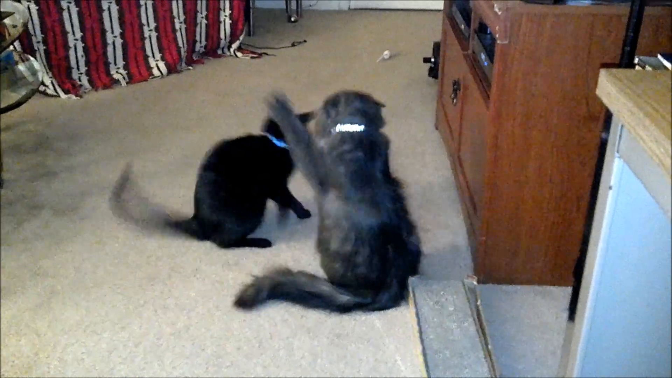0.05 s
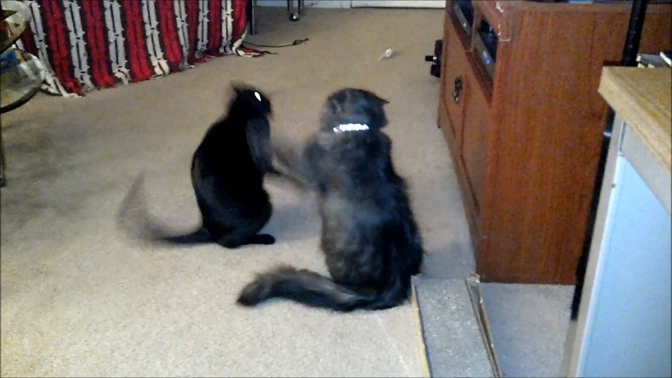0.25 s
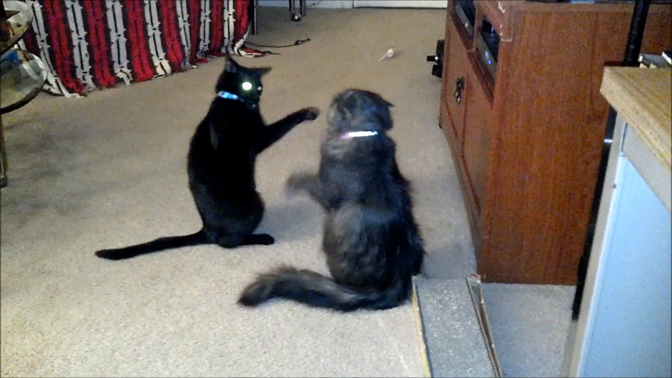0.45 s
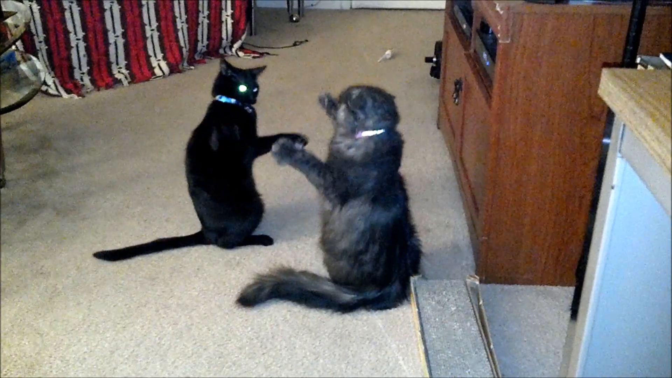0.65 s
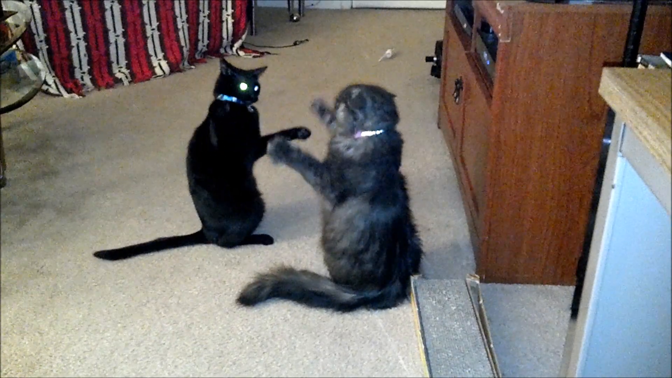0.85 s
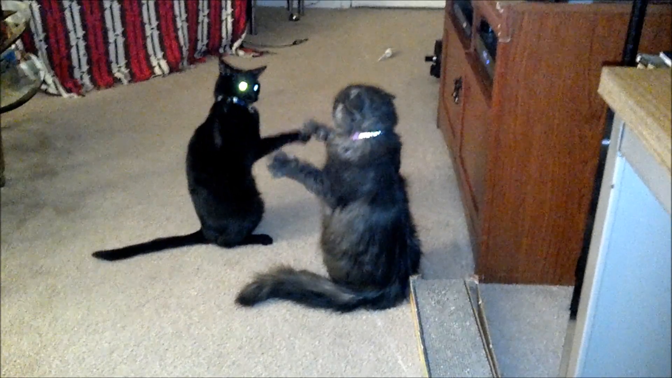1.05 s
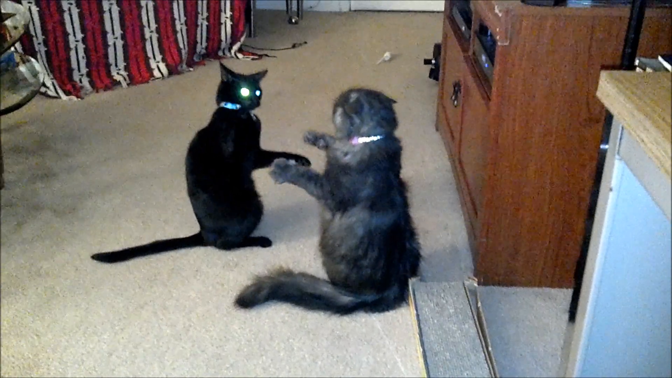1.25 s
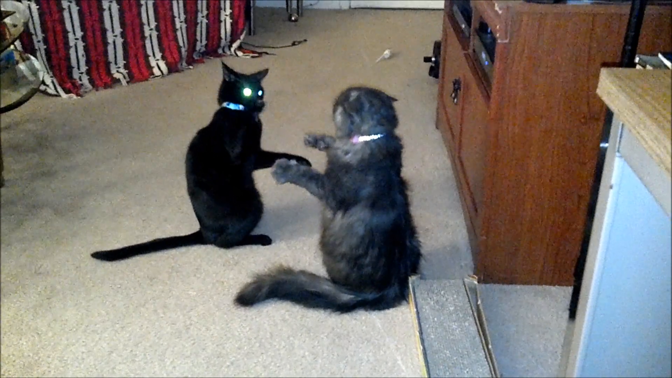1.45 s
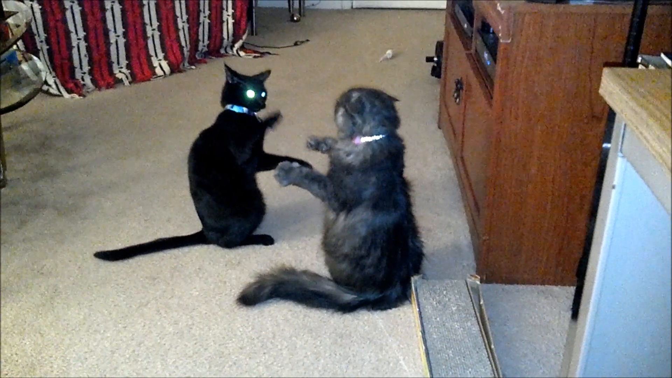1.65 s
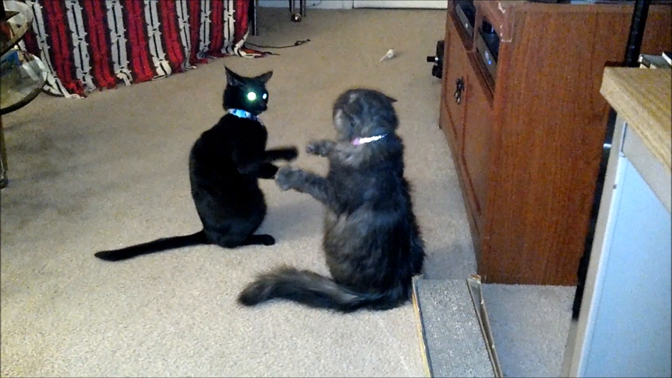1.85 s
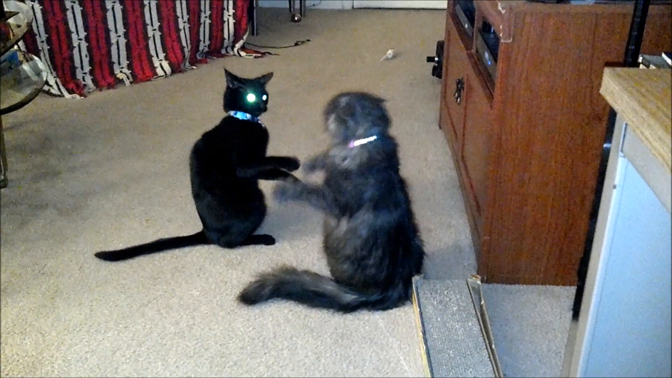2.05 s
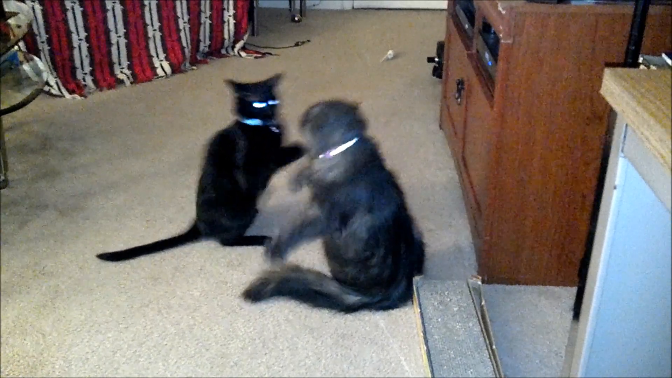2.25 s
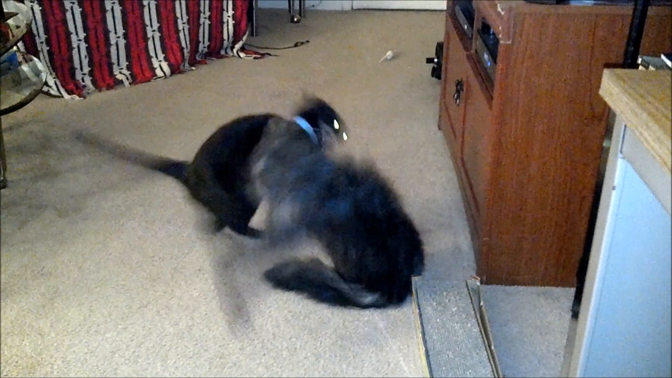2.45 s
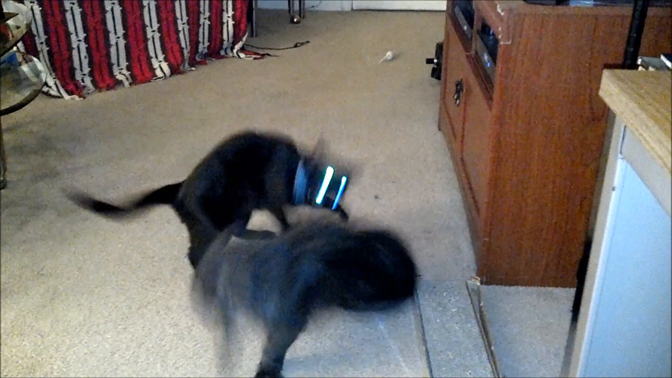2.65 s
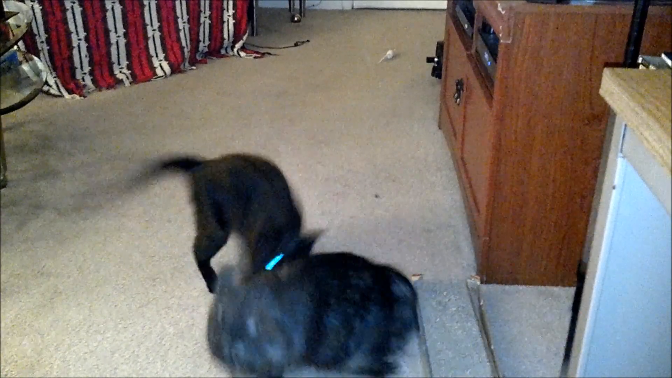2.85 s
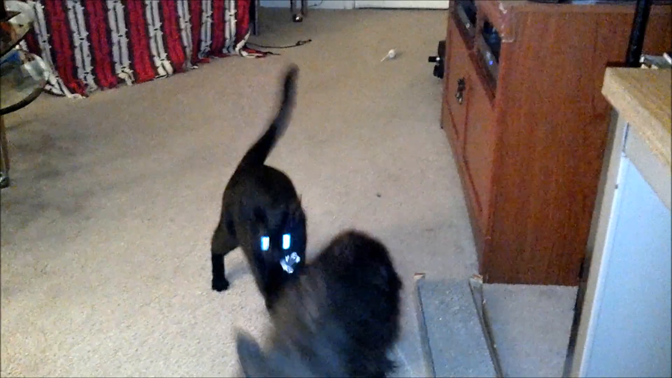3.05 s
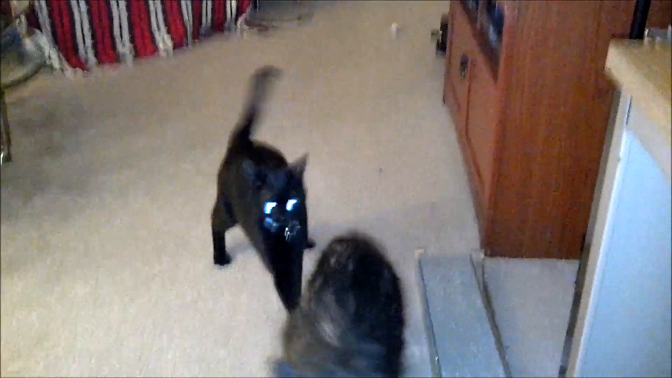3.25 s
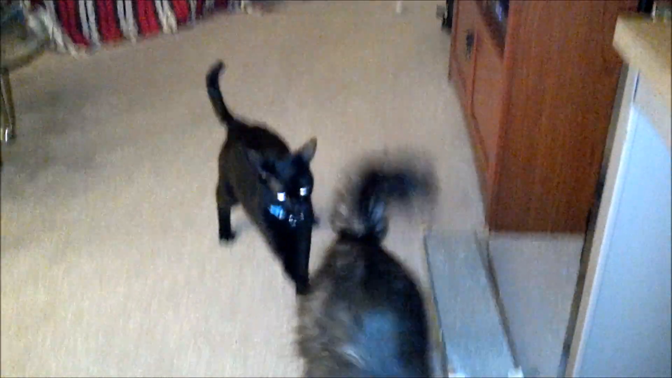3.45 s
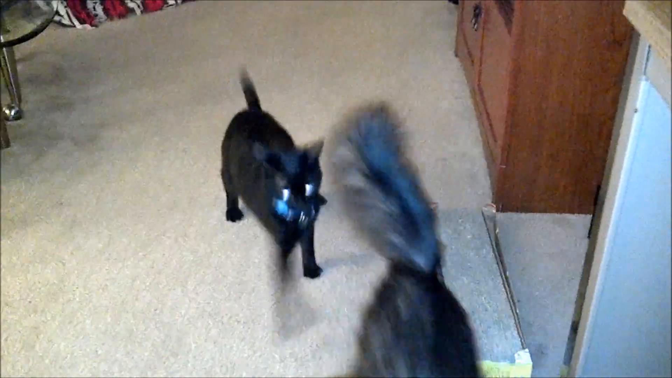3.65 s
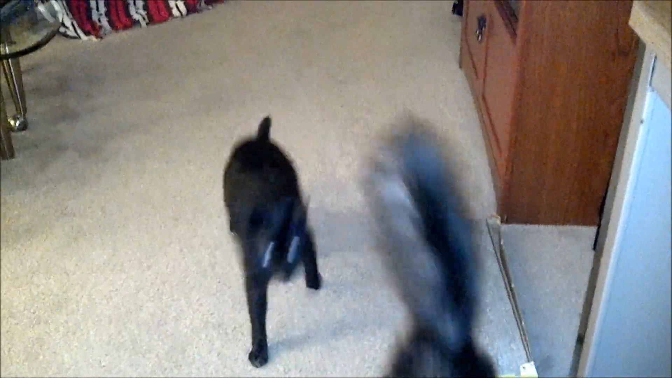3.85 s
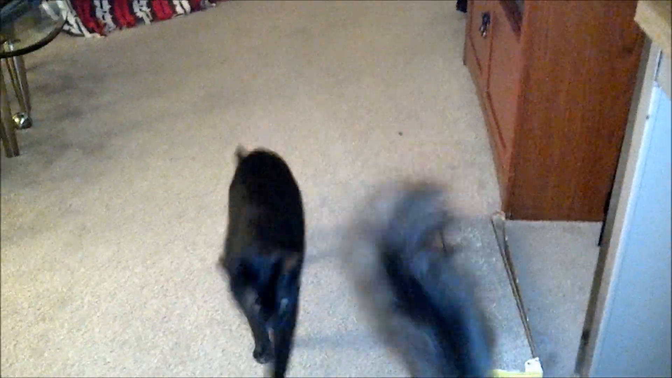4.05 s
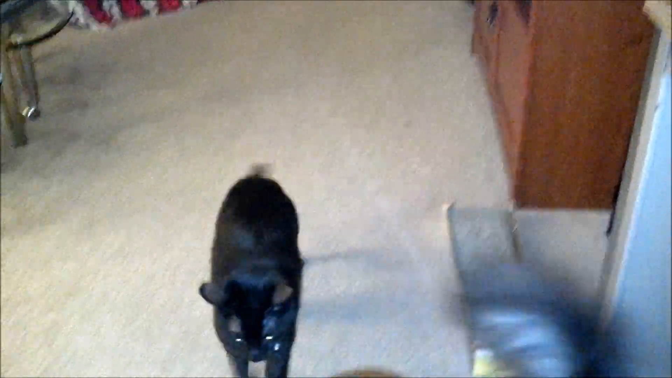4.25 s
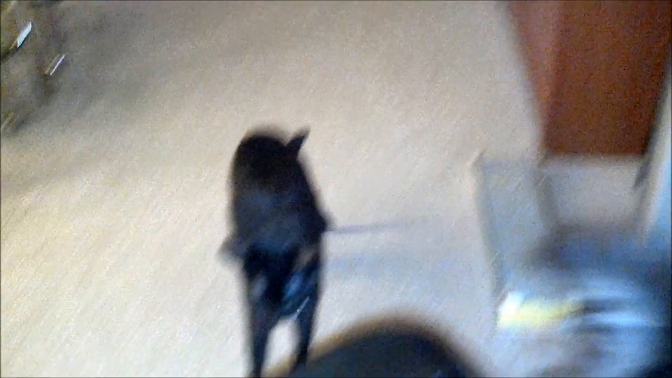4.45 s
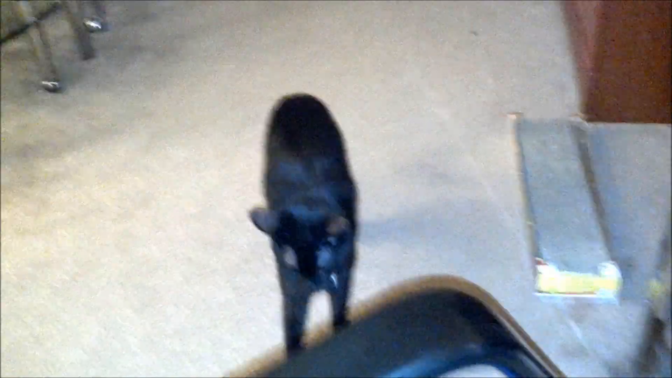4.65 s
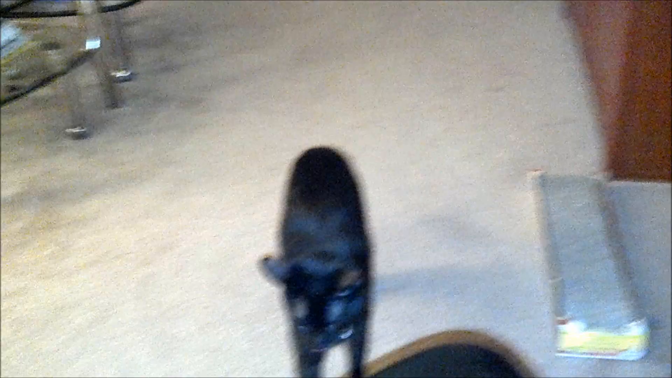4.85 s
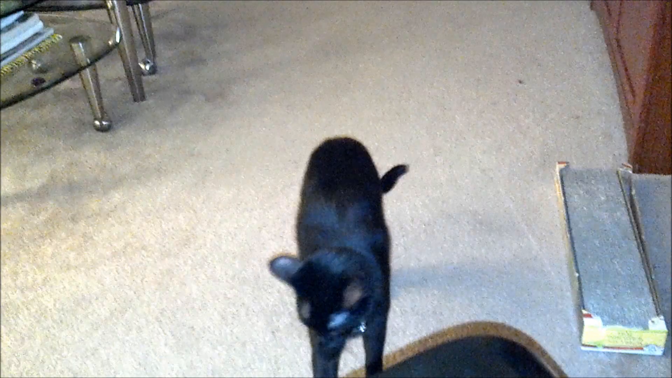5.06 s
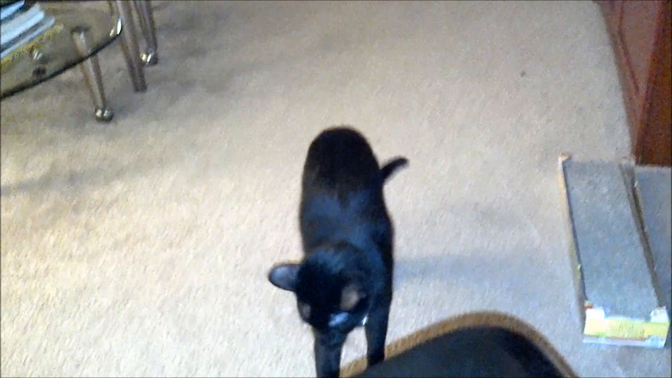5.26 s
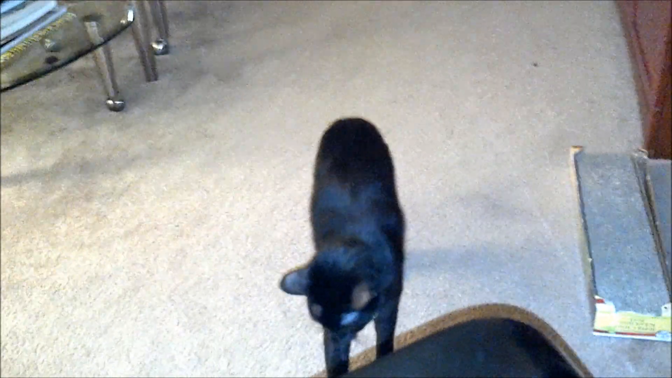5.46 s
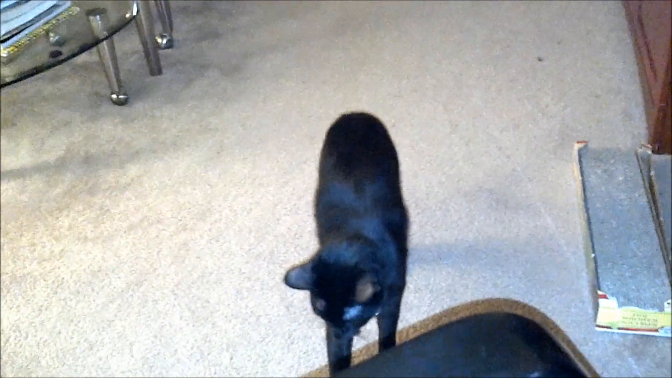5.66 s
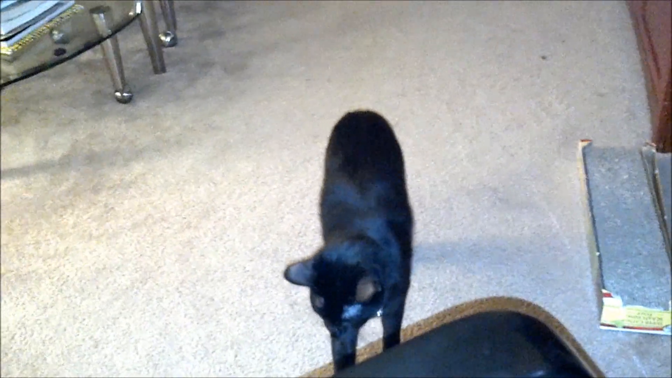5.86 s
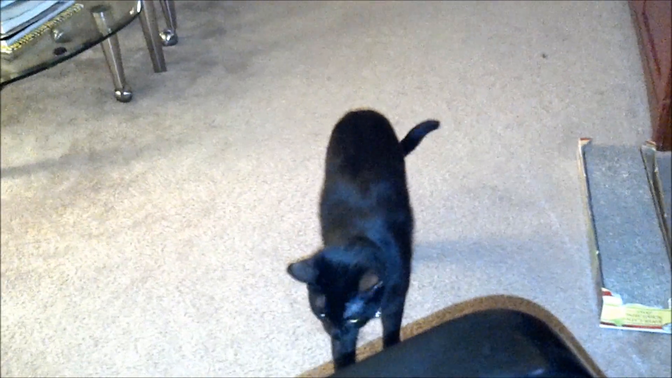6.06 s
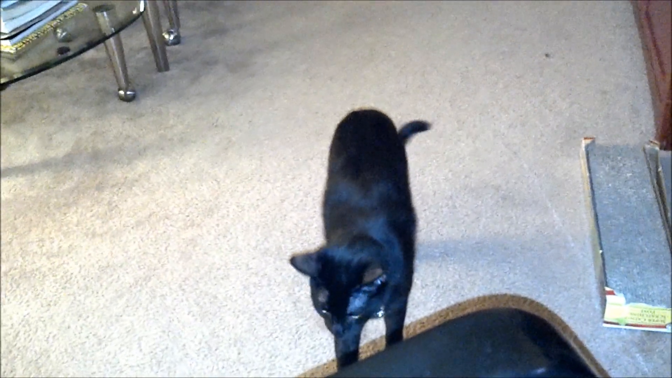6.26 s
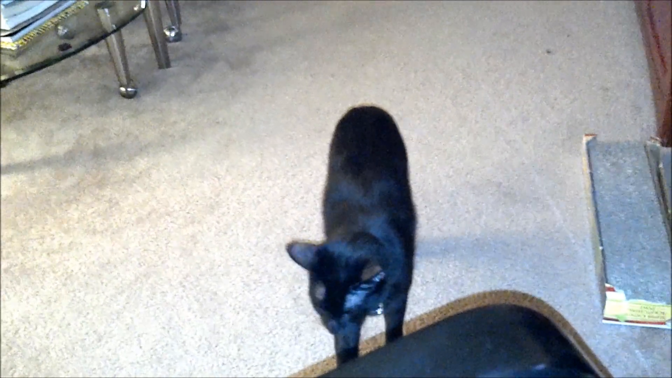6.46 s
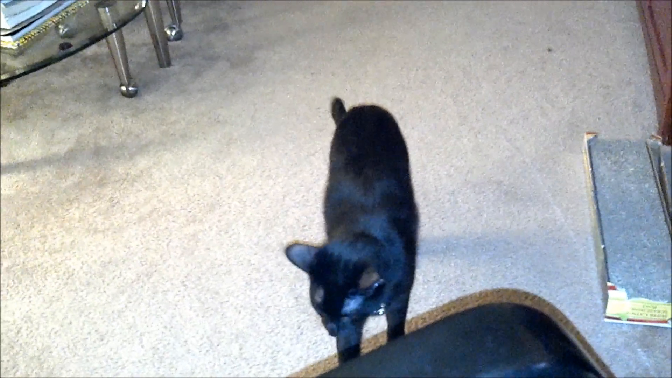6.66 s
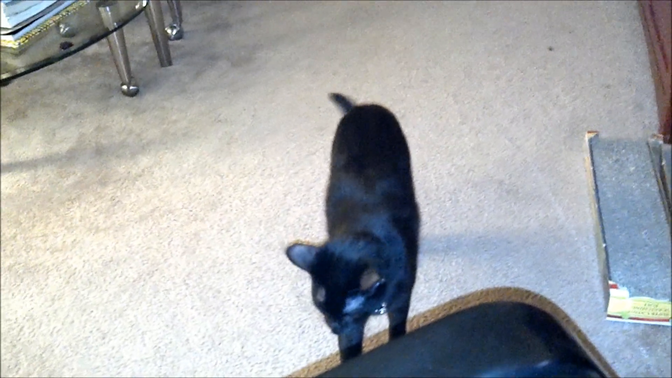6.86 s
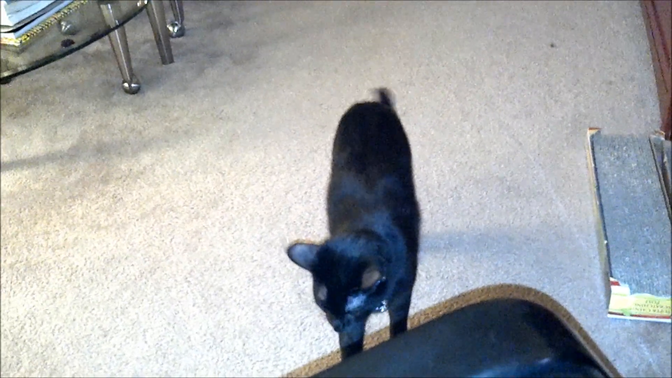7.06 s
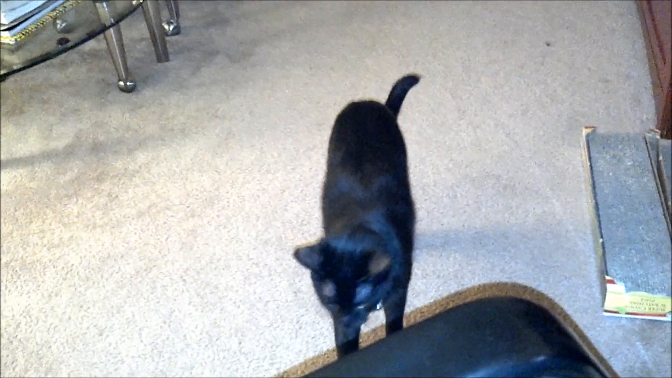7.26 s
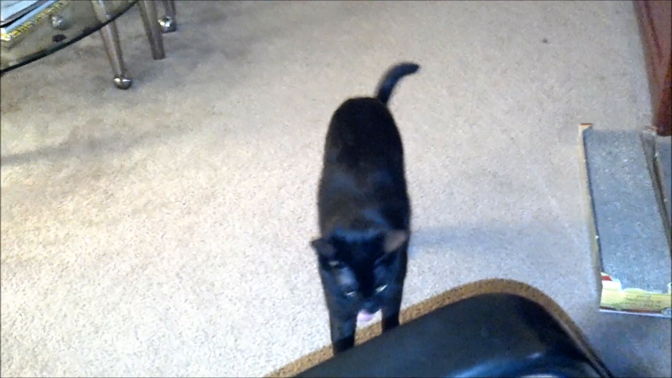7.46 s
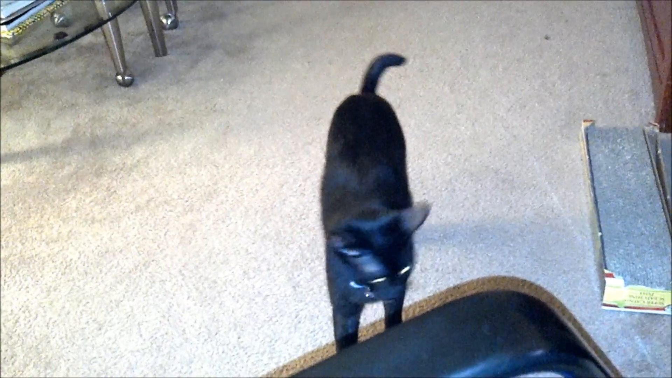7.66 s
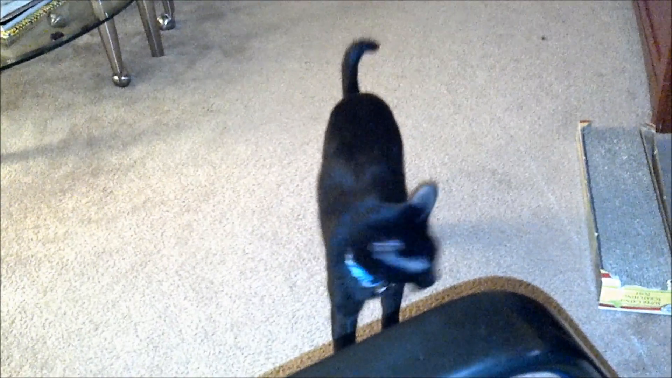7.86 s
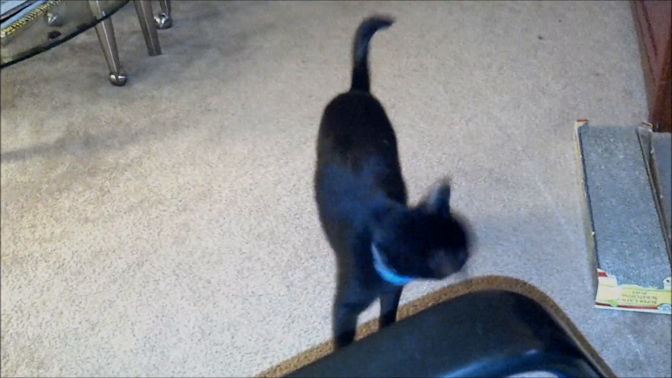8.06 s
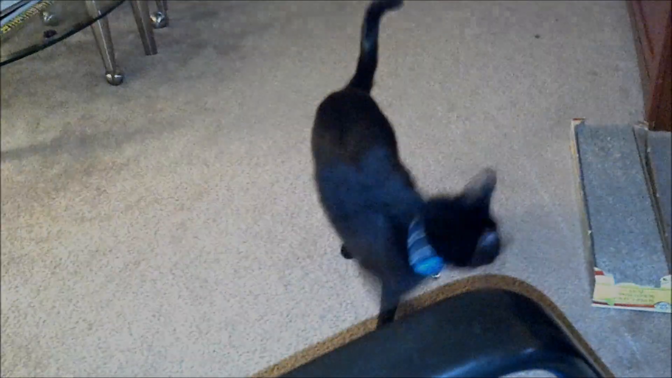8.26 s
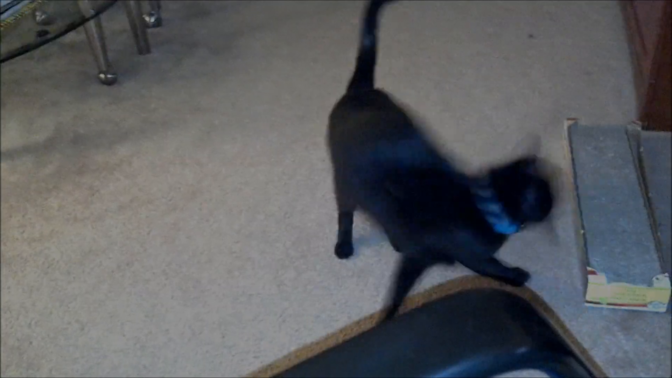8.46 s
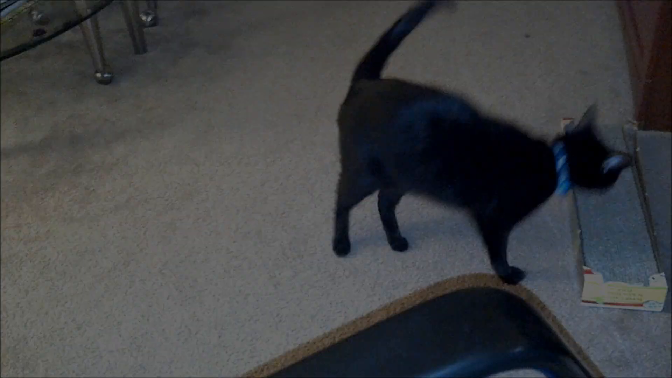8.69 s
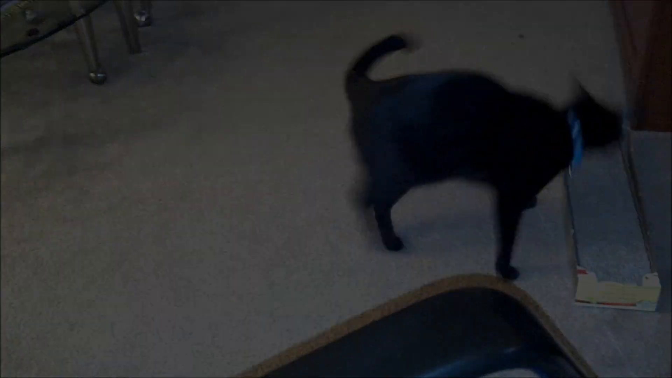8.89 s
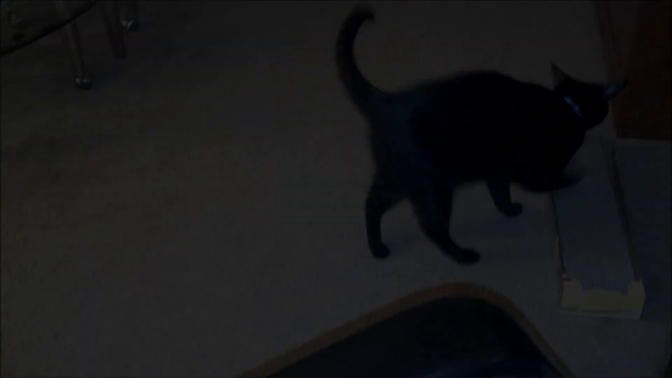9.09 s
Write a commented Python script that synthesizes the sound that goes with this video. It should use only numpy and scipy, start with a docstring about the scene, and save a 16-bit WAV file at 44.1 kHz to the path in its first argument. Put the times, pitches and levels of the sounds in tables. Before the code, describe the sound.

Steady fan hum and a faint high whine in a carpeted room, soft thumps, then two cats scuffle with a furry swish before everything fades.

```python
"""A quiet carpeted room, with two cats close to a hand-held camera's two microphone ports.
Throughout: fan air and faint narrow bands of noise, motor hum as tones, a picture tube's beating whistle.
Soft thumps as bursts of noise and low rumbles with gliding tones come first and return later.
Near 2.8 s the cats scuffle: short resonant scuffs, and a long noise swish of fur as they break apart.
The stereo widener subtracts a delayed copy of the opposite side; from 4.87 s the sound fades down."""
import sys
import numpy as np
from scipy import signal
from scipy.fft import rfft, irfft
from scipy.io import wavfile

SR = 44100
rng = np.random.default_rng(int(sys.argv[2]) if len(sys.argv) > 2 else 0)


def unload_wav(signal):
    """Save mono or channel-first audio to the path in sys.argv[1] as 16-bit WAV at rate SR, clipped to [-1, 1]."""
    wavfile.write(
        sys.argv[1],
        SR,
        np.round(np.clip(np.atleast_2d(signal).T, -1, 1) * 32767).astype(np.int16),
    )


N = 402493
TIME = np.arange(N) / SR
BINS_HZ = np.fft.rfftfreq(N, 1 / SR)
# Levels below are those at the ports, ahead of the widener and the fade.


def gain_of(db):
    """Turns decibels into amplitude."""
    return 10 ** (np.asarray(db) / 20)


def evened(x):
    """Scales to an rms of 1, over both ports together."""
    return x / np.sqrt(np.mean(x ** 2) + 1e-30)


def over_pitch(table):
    """Spreads a table's columns over the spectrum, joined on a log frequency axis."""
    hz, *columns = np.transpose(table)
    return [np.interp(np.log(BINS_HZ + 1), np.log(hz), column) for column in columns]


def over_time(table):
    """Spreads a table's columns over time, joined by straight lines."""
    s, *columns = np.transpose(table)
    return [np.interp(TIME, s, column) for column in columns]


def drift(cutoff_hz):
    """Random wandering of rms 1: white noise through a Gaussian low-pass."""
    spectrum = rfft(rng.standard_normal(N))
    return evened(irfft(spectrum * np.exp(-(BINS_HZ / cutoff_hz) ** 2), N))


def port_noise(ports):
    """White noise spectra at the two ports, partly alike, shifted in phase and unequal in level."""
    same, lead, balance_db = over_pitch(ports)
    shared, own = rfft(rng.standard_normal((2, N)))
    half_balance = gain_of(balance_db / 2)
    left = shared * np.exp(1j * lead) * half_balance
    right = (same * shared + np.sqrt(1 - same ** 2) * own) / half_balance
    return np.array([left, right])


def near_noise(size, same):
    """White noise at both ports, whose likeness (0-1) is set by the part they share."""
    shared = rng.standard_normal(size)
    own = rng.standard_normal((2, size))
    return np.sqrt(same) * shared + np.sqrt(1 - same) * own


def resonate(x, hz, width_hz):
    """A steep resonance: shift its centre to zero, smooth with a double pole, shift back."""
    turn = np.exp(2j * np.pi * np.cumsum(hz * np.ones(x.shape[-1])) / SR)
    r = np.exp(-np.pi * width_hz / SR)
    smooth = signal.lfilter([(1 - r) ** 2], [1, -2 * r, r * r], x / turn)
    return (turn * smooth).real


def envelope(start, length, attack, release, sag_db_per_s=0):
    """Rises, sags from the start at a steady rate in dB, and is released at the end of its length."""
    age = TIME - start
    gate = np.clip(age / attack, 0, 1) * np.clip((length - age) / release, 0, 1)
    return gate * gain_of(-sag_db_per_s * np.clip(age, 0, length))


def air(level_db=-46.5, swell_db=0.38):
    """The even rush of a fan: noise, barely swelling, coloured by the room's standing waves."""
    # Tone balance of the air: pitch_hz, relative_level_db (per Hz)
    balance = [(25.0, -84), (70.0, -86.5), (120.0, -74.5), (220.0, -75), (380.0, -71), (480.0, -77),
               (680.0, -80.5), (820.0, -74), (1400.0, -90.5), (2300.0, -89.5), (2750.0, -91.5),
               (4400.0, -101.1), (8000.0, -110.6), (10000, -112.3), (13600, -111.5), (14200, -124)]
    # Arrival at the ports: pitch_hz, likeness (0-1), left_lead_rad, left_minus_right_db
    ports = [(25.0, 0.93, 0.0, 0.0), (60.0, 0.8, 0.0, 0.1), (130.0, 0.91, -0.2, 0.2),
             (270.0, 0.67, -0.1, 1.8), (350.0, 0.95, -0.2, -1.5), (560.0, 0.89, -0.6, -2.8),
             (900.0, 0.91, -1.1, -0.5), (1150.0, 0.45, -1.6, -4.5), (1600.0, 0.5, -3.3, -0.3),
             (2250.0, 0.23, -2.6, -7.7), (3000.0, 0.58, -3.1, -0.7), (5000.0, 0.18, -4.6, -1.3)]
    # Narrow bands lifted or sunk by standing waves: pitch_hz, bell_sigma_hz, change_db
    standing = [(150, 18, -2), (197, 18, 4.5), (275, 16, -3.5), (314, 7, 2.5), (345, 8, 2.0),
                (479, 8, -3.6), (608, 12, -3.9), (705, 12, -5.5), (872, 12, -3.9), (1039, 35, -2.0),
                (1179, 12, -4.4), (1500, 30, -1.5), (1630, 22, 3), (2120, 30, 2), (2250, 35, -2.2),
                (2740, 80, -7.5), (2950, 40, 3), (3190, 70, -2.2), (3494, 100, -3.1), (4390, 70, 3.2),
                (4670, 60, 2), (5280, 110, 1.8)]
    ripple_db = sum(db * np.exp(-((BINS_HZ - hz) / sigma) ** 2 / 2) for hz, sigma, db in standing)
    rush = irfft(port_noise(ports) * gain_of(over_pitch(balance)[0] + ripple_db), N)
    return gain_of(level_db + swell_db * drift(4.5)) * evened(rush)


def hum(wander=0.00028, waver_db=0.5):
    """Mains and motor lines share one slightly unsteady speed; levels shift as the camera moves."""
    # Lines: pitch_hz, left_db, right_db, left_lead_rad, then left_change_db, right_change_db after the move
    lines = [(121, -60, -60, 0.33, -3, -5), (242, -61, -61, -0.5, -5, -4.5), (421.0, -58, -48, 0.19, 8, 2),
             (841.95, -53, -48.5, -1.12, 1, 0), (1263, -69, -71.5, 4, -8.5, -1),
             (1686, -74, -78, 3.5, 0.5, -6), (2115, -80, -71, 4.5, 7, -3)]
    # The camera's move: start_s, end_s
    camera_move = (3.7, 4.53)
    clock = np.cumsum(1 + wander * drift(4.5)) / SR
    moved = np.interp(TIME, camera_move, [0, 1])
    out = np.zeros((2, N))
    for hz, left_db, right_db, lead, left_change_db, right_change_db in lines:
        angle = 2 * np.pi * (hz * clock + rng.random())
        left = gain_of(left_db + left_change_db * moved) * np.sin(angle + lead)
        right = gain_of(right_db + right_change_db * moved) * np.sin(angle)
        out += np.sqrt(2) * np.array([left, right]) * gain_of(waver_db * drift(4.4))
    return out


def narrow_bands(level_db=-3, blur_hz=2):
    """Faint narrow bands of noise that colour the air, wavering independently at each port."""
    # Narrow bands: centre_hz, level_db (before the overall level_db is added)
    bands = [(1324, -71), (1471, -75), (1632, -78), (1700, -75), (1772, -82), (2121, -76.5), (3628, -83.5),
             (4086, -81.5)]
    shape = sum(gain_of(db) * np.exp(-((BINS_HZ - hz) / blur_hz) ** 2 / 2) for hz, db in bands)
    total = np.sqrt(sum(gain_of(db) ** 2 for hz, db in bands))
    noise = irfft(rfft(rng.standard_normal((2, N))) * shape, N)
    return gain_of(level_db) * total * evened(noise)


def whistle(line_hz=15734.2, beat_hz=13.15, second_db=-6, left_db=-19.0, lead=0.05, jitter=0.1):
    """A picture tube's line whistle, buzzing at picture rate; a line just above beats in the left port."""
    # Rise and fall as the camera moves through the whistle's standing waves: time_s, level_db
    level = [(0.05, -50.5), (3.2, -51), (3.55, -47.5), (3.98, -54), (4.45, -55), (4.7, -48.5), (4.86, -48),
             (4.98, -58), (5.2, -49.5), (5.62, -46.5), (6.35, -52), (6.85, -60.5), (7.25, -57), (7.68, -58),
             (7.85, -67), (8.7, -58), (9.1, -61)]
    # Picture-rate buzz: rate_hz, depth (0-1)
    picture_buzz = [(59.94, .08), (119.88, .045)]
    angle = 2 * np.pi * line_hz * TIME
    second = gain_of(second_db) * np.sin(angle + 2 * np.pi * beat_hz * TIME)
    left = gain_of(left_db) * np.sin(angle + lead) + second
    pair = np.array([left, np.sin(angle)])
    buzz = 1 + sum(depth * np.sin(2 * np.pi * hz * TIME) for hz, depth in picture_buzz)
    unsteady = 1 + jitter * drift(180)
    return np.sqrt(2) * gain_of(over_time(level)[0]) * buzz * pair * unsteady


def add_burst(mix, centre_s, db, sigma_s, hz, width_hz, same):
    """Adds a soft bell-shaped burst of resonant noise centred on centre_s."""
    size = SR // 2
    bell = np.exp(-((np.arange(size) - size / 2) / SR / sigma_s) ** 2 / 2)
    burst = resonate(near_noise(size, same), hz, width_hz) * bell
    first = round(centre_s * SR) - size // 2
    mix[:, first:first + size] += gain_of(db) * evened(burst) * np.sqrt(np.mean(bell ** 2))


def thumps():
    """Padded knocks from paws and the moving camera: bell-shaped bursts of resonant noise."""
    # Knocks: centre_s, level_db, pitch_hz, bell_sigma_s, width_hz
    knocks = [(.44, -56, 115, 0.023, 65), (.45, -49, 497, 0.018, 65), (3.36, -43, 111, 0.012, 55),
              (3.384, -39, 140, .009, 75), (3.585, -51, 105, 0.02, 65), (3.735, -52, 130, .008, 65),
              (3.838, -48, 140, .007, 65), (4.425, -44, 126, 0.012, 65), (4.48, -41, 125, 0.023, 65),
              (4.87, -50, 101, 0.018, 50), (5.455, -54.5, 115, 0.032, 65), (5.76, -56, 101, .02, 50),
              (6.645, -43, 145, 0.0086, 65), (6.772, -52, 110, .007, 65), (7.32, -57, 90, .014, 50)]
    out = np.zeros((2, N))
    for centre_s, db, hz, sigma_s, width_hz in knocks:
        add_burst(out, centre_s, db, sigma_s, hz, width_hz, same=0.36)
    return out


def rumble(low_cut_hz=95, attack_s=0.088, release_s=0.11, sag_db_per_s=5):
    """Swells of dull low noise, each in one broad resonance, rising quickly and dying away."""
    # Swells: start_s, length_s, level_db (before the sag), centre_hz, width_hz
    swells = [(0.655, 1.12, -47.5, 182, 70), (0.62, 1.25, -47.5, 241, 61), (2.18, 0.344, -47.5, 204, 220),
              (4.52, 1.18, -50.5, 170, 95)]
    low_cut = signal.butter(4, low_cut_hz, "highpass", fs=SR, output="sos")
    noise = signal.sosfilt(low_cut, near_noise(N, same=0.92))
    out = np.zeros((2, N))
    for start, length, db, hz, width_hz in swells:
        swell = envelope(start, length, attack_s, release_s, sag_db_per_s)
        out += gain_of(db) * evened(resonate(noise, hz, width_hz)) * swell
    return out


def drone(wobble=0.0063, waver_db=1.5, attack_s=0.023, release_s=0.062):
    """Faint unsteady low tones, alike in both ports, each bending through one smooth arc of pitch."""
    # Gliding tones: start_s, length_s, level_db, first_hz, middle_hz, last_hz
    glides = [(.74, 0.39, -49, 133.2, 142.6, 141), (0.72, 0.67, -53, 238, 246.3, 243),
              (1.128, 0.83, -53, 128.1, 123, 113.7), (4.581, 0.29, -48.5, 126, 144, 120),
              (4.871, 0.36, -48, 183.7, 162.4, 165), (5.04, 0.25, -52.5, 194.7, 188, 170),
              (5.14, 0.4, -54, 225, 221, 210), (5.228, 0.34, -47.5, 160, 130, 112)]
    unsteady = 1 + wobble * drift(12.9)
    waver = gain_of(waver_db * drift(20))
    out = np.zeros(N)
    for start, length, db, first_hz, middle_hz, last_hz in glides:
        along = np.clip((TIME - start) / length, 0, 1)
        arc = np.polyfit([0, 0.5, 1], [first_hz, middle_hz, last_hz], 2)
        hz = np.polyval(arc, along) * unsteady
        tone = np.sqrt(2) * np.sin(2 * np.pi * np.cumsum(hz) / SR)
        out += gain_of(db) * envelope(start, length, attack_s, release_s) * tone
    return out * waver


def strokes(same=0.59, fibres_per_s=3500, attack_s=0.011, release_s=0.026):
    """Paws and bodies scuff the carpet: fibres let go at random and excite one broad resonance."""
    # Scuffs: start_s, length_s, level_db, centre_hz, width_hz
    scuffs = [(2.76, 0.079, -53.5, 1320, 800), (2.763, .1, -62, 2900, 1500), (2.795, 0.042, -48, 780, 250),
              (2.858, 0.076, -53, 3830, 2600), (2.858, 0.056, -47, 1400, 900), (2.89, 0.084, -37, 409, 50),
              (2.897, 0.073, -44.5, 1044, 55), (2.9, 0.077, -44.5, 1470, 710),
              (2.912, 0.054, -44, 4800, 3900), (2.99, 0.047, -45, 393, 70), (3.015, 0.072, -48.5, 795, 200),
              (3.05, 0.064, -40, 222, 70), (3.125, 0.074, -50, 1350, 700), (3.145, 0.046, -39, 827, 90),
              (3.14, 0.055, -58, 3960, 3000), (3.17, .055, -43, 280, 70), (3.18, 0.093, -45.5, 833, 130),
              (3.27, 0.072, -43, 220, 80), (3.285, 0.037, -47, 740, 250), (3.29, 0.081, -51.5, 1430, 800),
              (3.345, 0.041, -48, 760, 250)]
    out = np.zeros((2, N))
    age = np.arange(SR // 4) / SR
    for start, length, db, hz, width_hz in scuffs:
        fibres = near_noise(len(age), same) * (rng.random(len(age)) < fibres_per_s / SR)
        gate = np.clip(age / attack_s, 0, 1) * np.clip((length - age) / release_s, 0, 1)
        scuff = evened(resonate(fibres, hz, width_hz) * gate) * np.sqrt(np.mean(gate ** 2))
        first = round(start * SR)
        out[:, first:first + len(age)] += gain_of(db) * scuff
    return out


def swish(split_hz=7500, rub_db=-40.5, fizz_db=-49.5, grain_db=0.95, fizz_grain_db=1.1, snag_db=1.26):
    """Fur brushes past in one contact: a dull snagging rub and a fizz of hairs swell with each lunge."""
    # Tone balance of the fur: pitch_hz, relative_level_db (per Hz)
    balance = [(80.0, -92), (200.0, -61), (370.0, -62), (600.0, -75), (760.0, -70.5), (1050.0, -69.5),
               (1450.0, -75), (2200.0, -76), (3300, -80.5), (5500.0, -86), (8000.0, -88), (12500.0, -83.5),
               (14800.0, -87.5)]
    # Arrival at the ports: pitch_hz, likeness (0-1), left_lead_rad, left_minus_right_db
    ports = [(181, 1, -0.2, 2), (400.0, 0.79, -0.06, -2), (670, 0.63, 0.2, 5), (1050, 0.52, 0, 7.5),
             (2000.0, 0.52, 2.5, -5.5), (3600, 0.33, 5, -5), (7250, 0.16, 5, -4), (13000.0, 0.1, 9, 2)]
    # Lunges press the fur harder: centre_s, rub_lift_db, fizz_lift_db, bell_sigma_s
    lunges = [(2.927, 4, 6.5, 0.046), (3.192, 2, 2, 0.073)]
    rub_lift_db = fizz_lift_db = 0
    for centre_s, rub_push_db, fizz_push_db, sigma_s in lunges:
        push = np.exp(-((TIME - centre_s) / sigma_s) ** 2 / 2)
        rub_lift_db = rub_lift_db + rub_push_db * push
        fizz_lift_db = fizz_lift_db + fizz_push_db * push
    noise = port_noise(ports) * gain_of(over_pitch(balance)[0])
    fine = 1 / (1 + (split_hz / (BINS_HZ + 1)) ** 6)  # share of each pitch that goes to the fizz
    # The rub takes hold, slowly loses pressure and slips off; the fizz starts and stops more abruptly.
    rub_shape = envelope(2.764, 0.697, attack=0.13, release=0.11, sag_db_per_s=2.5)
    fizz_shape = envelope(2.765, 0.705, attack=0.065, release=0.083, sag_db_per_s=2)
    rub = rub_shape * evened(irfft(noise * (1 - fine), N))
    fizz = fizz_shape * evened(irfft(noise * fine, N))
    rub_level_db = rub_db + rub_lift_db + grain_db * drift(150) + snag_db * drift(32)
    fizz_level_db = fizz_db + fizz_lift_db + fizz_grain_db * drift(200)
    return rub * gain_of(rub_level_db) + fizz * gain_of(fizz_level_db)


def scene():
    """Sums everything that reaches the two microphone ports."""
    steady = air() + hum() + narrow_bands() + whistle()
    return steady + thumps() + rumble() + drone() + strokes() + swish()


def record(dry, delay_samples=16, edge_hz=16000):
    """Each side loses a delayed copy of the other, widening the image; then the fade and band limit."""
    # Closing fade: time_s, gain (the first gain also holds before it)
    fade = [(4.87, 0.89), (9.13, 0.085)]
    other = np.pad(dry[::-1], ((0, 0), (delay_samples, 0)))[:, :N]
    wide = (dry - other) * over_time(fade)[0]
    low_pass = signal.firwin(1023, edge_hz, window=("kaiser", 9), fs=SR)
    return signal.oaconvolve(wide, low_pass[None], "same")


dry = scene()
out = record(dry)
unload_wav(out)
```